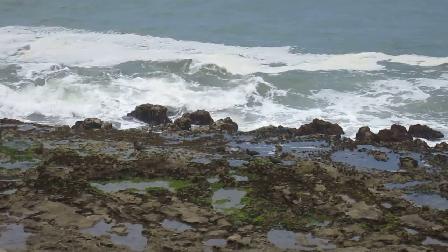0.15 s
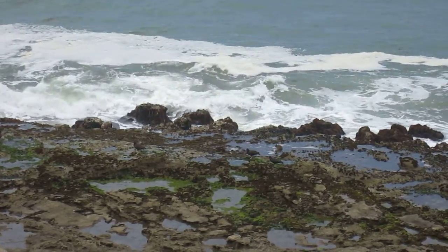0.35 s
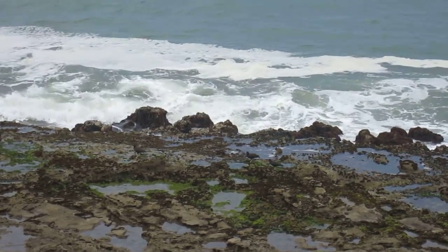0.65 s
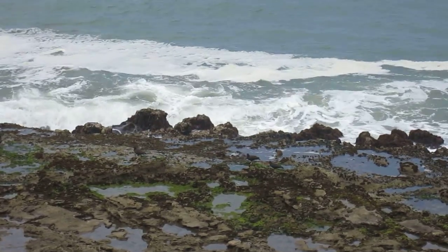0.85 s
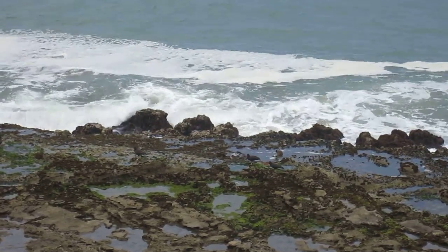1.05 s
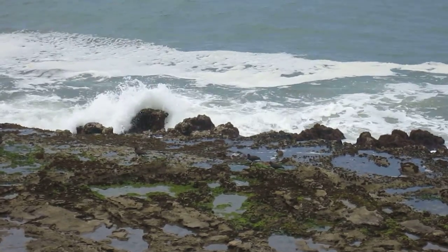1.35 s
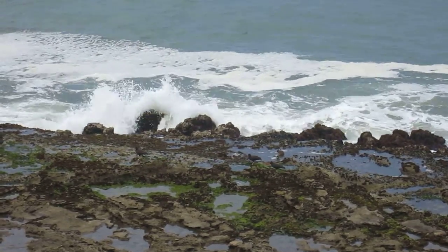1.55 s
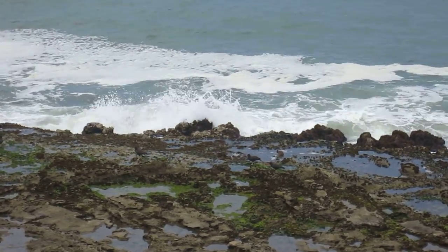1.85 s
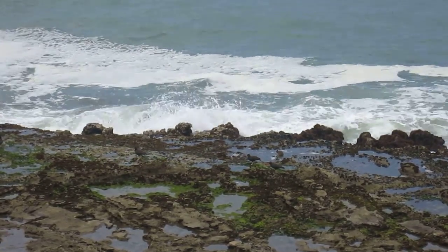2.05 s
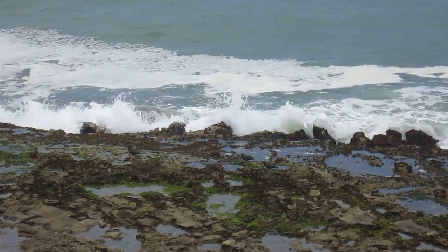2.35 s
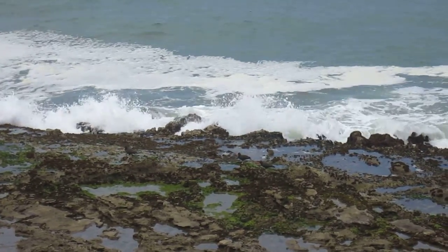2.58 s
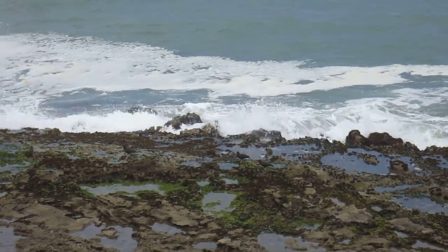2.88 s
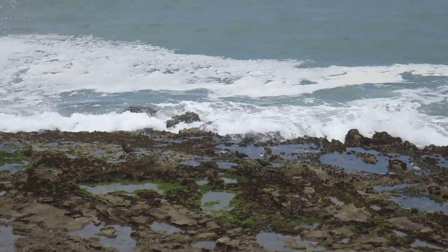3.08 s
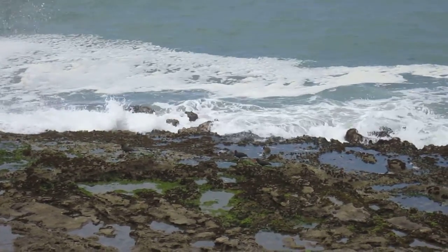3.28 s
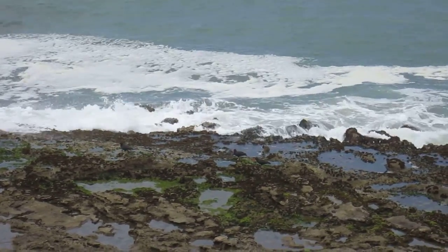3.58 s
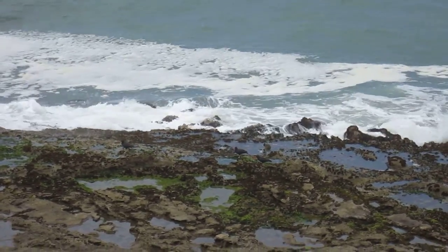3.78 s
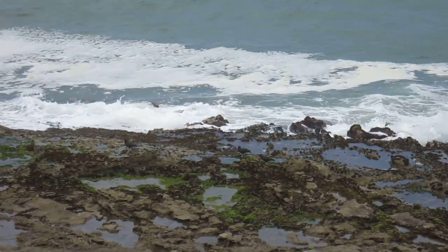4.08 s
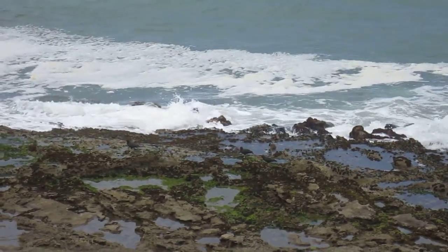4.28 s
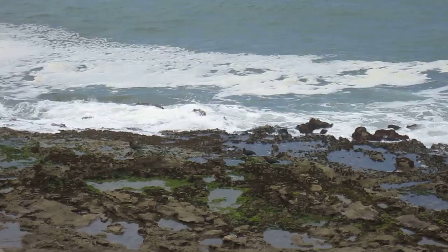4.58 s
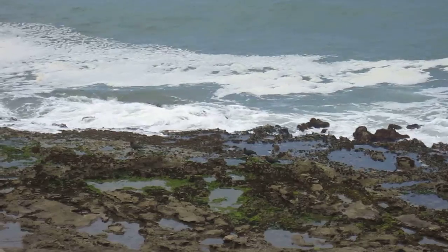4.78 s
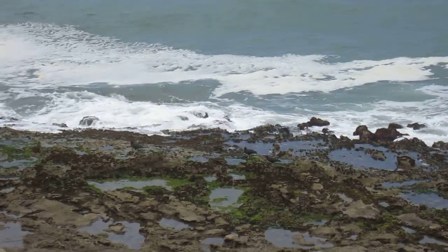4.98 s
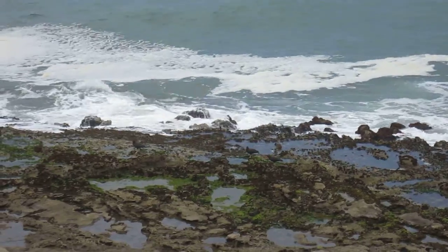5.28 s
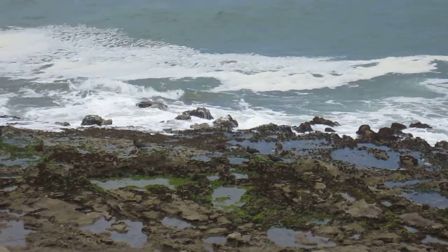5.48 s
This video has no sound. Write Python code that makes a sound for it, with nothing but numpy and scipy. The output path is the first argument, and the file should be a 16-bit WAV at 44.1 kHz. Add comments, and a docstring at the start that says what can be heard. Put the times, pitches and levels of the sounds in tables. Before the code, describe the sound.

Outdoors on a rocky seashore, lasting about 5.6 seconds. A sharp pipe and a heavy wind thud open together. An oystercatcher then pipes at about 0.7, 1.2, 1.7, 2.2, 2.7, 3.1, 3.7, 4.1, 4.7 and 5.2 seconds; each note is a tiny hoarse upward slide leaping to a clear, piercing whistle near 3 kHz, under a tenth of a second long, dropping abruptly at its end. The first two are weaker; those at 2.7 and 4.7 are strongest. Short dull rock echoes follow. Lumpy deep wind rumbles throughout, thudding hard near 0, 1.2 and 5 seconds, with clattering knocks near 1.2, 1.4, 2.7 and 5.4. Behind, broad soft surf stays steady, swells from 2.3 into a hissing foamy burst around 2.9-3.4, eases by 4, rises more dully near 4.5-5, and fades. Faint distant bird notes slip by at 1.8 and 4.9.

```python
"""First a sharp piped note and a thud of wind are heard together, on a rocky shore.
The note is the first of an oystercatcher's eleven, about two a second: low slides leaping to a whistle.
Behind it a wave bursts on the rocks and washes out as hissing foam, made of noise and random pops.
Wind rumbles on the microphone as filtered noise; large eddies thud on it and small ones knock.
Faint notes of birds farther along the shore are gliding sines; the rocks echo all the birds."""
import sys
import numpy as np
from scipy import signal
from scipy.fft import rfft, irfft
from scipy.io import wavfile
from scipy.ndimage import uniform_filter1d

SR = 44100
rng = np.random.default_rng(int(sys.argv[2]) if len(sys.argv) > 2 else 0)


def transcribe(u):
    """Save the signal u as a 16-bit wav file named by the first command-line argument.

    u: samples, shape (n,) or (channels, n), limited to [-1, 1]; the rate is SR.
    q: integer samples, one column per channel.
    """
    v = np.clip(np.atleast_2d(u).T, -1, 1)
    q = np.round(v * 32767).astype(np.int16)
    wavfile.write(sys.argv[1], SR, q)


N = 248283  # length [samples]

# Wind on the microphone, before the trims in wind(): (time [s], rumble level [dB], flutter level [dB])
WIND_LEVELS = [(0.0, -20, -19.5), (0.24, -19.0, -27.5), (0.36, -21.5, -24), (0.93, -23.0, -29),
               (1.17, -17, -20.5), (1.29, -24, -30.5), (1.5, -20, -21.5), (1.68, -28, -29.5),
               (1.92, -19, -22), (2.28, -24.5, -28.0), (2.97, -17, -21.5), (3.33, -24.5, -30.5),
               (3.54, -17, -23.5), (3.75, -20.5, -28), (4.26, -20.5, -22.5), (4.41, -24.0, -26.5),
               (5.28, -22.5, -23.5), (5.61, -27, -27.5)]
# Relative spectral density of the wind: (frequency [Hz], density [dB per Hz])
WIND_COLOUR = [(8, -43), (22, 3.5), (45, 1), (80, -0.5), (120, -2.5), (170, -7), (250, -13), (400, -21.5),
               (700, -32), (1500, -51.5), (4000, -72)]
# Buffets, each the dull thud of one large eddy: (time of centre [s], peak level [dB], centre frequency [Hz])
BUFFETS = [(0.03, -5, 80.4), (.167, -9.5, 88), (.914, -13.5, 61.5), (1.053, -12, 90), (1.185, -6.5, 73.6),
           (1.387, -10, 102), (1.871, -13.5, 99), (2.041, -11, 101), (2.663, -14.5, 113), (2.712, -11, 93),
           (3.477, -12, 94), (3.672, -10, 98), (3.689, -10, 45.7), (3.982, -11.5, 71), (4.967, -6.5, 74),
           (5.005, -10, 104), (5.259, -9, 110)]
# Knocks, each a short clatter of small eddies:
# (time of first eddy [s], peak level [dB], centre frequency [Hz], clatter length [s])
KNOCKS = [(.0355, -13.5, 206, 0.0026), (1.1858, -7.5, 398, 0.0061), (1.3807, -8.5, 386, 0.014),
          (1.93, -16.5, 231, .004), (2.6688, -13, 480, .002), (3.969, -13.5, 218, 0.0017),
          (4.13, -16.5, 307, 0.0032), (5.4242, -8.5, 514, 0.0036)]
# Surf as a wave bursts and washes out, before the trims in surf():
# (time [s], roar level [dB], foam fizz level [dB])
SURF_LEVELS = [(0.0, -39, -63.0), (0.21, -43, -66.5), (0.66, -39.5, -64), (1.14, -40, -64.5),
               (1.38, -43.0, -71.5), (1.71, -39.5, -65), (2.31, -38.5, -62), (2.85, -34, -56),
               (3.39, -34.5, -55), (4.02, -37.5, -64), (4.53, -35.5, -60.0), (4.95, -34.5, -63),
               (5.07, -37.0, -68), (5.16, -35.5, -65.5), (5.49, -39, -69), (5.61, -38, -68.5)]
# Relative spectral density of breaking surf: (frequency [Hz], density [dB per Hz])
SURF_COLOUR = [(60, -24), (250, 2.5), (550, 4.5), (800, 0), (1100, -0.5), (1600, -3.5), (2050, -3.5),
               (2600, -6), (3600, -4.5), (5600, -8), (8000, -17.5), (10500, -27), (13000, -33.5),
               (15600, -42)]
# Echoes off the rocks, before their treble is dulled: (delay [s], level [dB])
ECHOES = [(0.018, -11.5), (.03, -28.5)]
# Faint notes of distant birds:
# (time [s], length [s], starting frequency [Hz], ending frequency [Hz], level [dB])
FAR_NOTES = [(1.824, .022, 1840, 2200, -39), (4.866, 0.048, 2420, 2570, -35)]
# Piped notes: (time of the leap to the high register [s], length [s], nominal pitch [Hz], level [dB],
# overtone level [dB], lead-in length [s], crest position [share of note], crest strength [0-1])
PIPED_NOTES = [(0.013, 0.05, 3000, -28, -19, 0.017, 0.75, 0.46),
               (.681, 0.05, 3037, -27.5, -23.5, 0.018, 0.46, 0.57),
               (1.189, 0.059, 2942, -25, -19.5, 0.013, 0.47, 0.7),
               (1.685, .055, 2960, -20.5, -20.5, 0.016, 0.84, .2),
               (2.181, .063, 2973, -23, -20.5, 0.016, 0.55, 0.7),
               (2.666, 0.06, 2955, -18.5, -21.5, 0.0095, 0.65, 1),
               (3.134, 0.061, 2974, -21.5, -20, .009, 0.52, 1),
               (3.665, .06, 2946, -22, -19.5, 0.013, 0.645, 0.7),
               (4.105, 0.06, 2970, -23, -23.5, 0.013, 0.57, 1),
               (4.684, 0.058, 2942, -18, -16, .013, 0.65, 0.46),
               (5.182, 0.059, 2960, -21, -20.5, .013, 0.63, 0.4)]
# Partials of the high register, from the fundamental up: (relative level [dB])
WHISTLE_PARTIALS = [0, -15.5, -22, -32.5, -54]
# Partials of the low lead-in, from the fundamental up: (relative level [dB])
LEAD_IN_PARTIALS = [-3, -7.5, -14.5, -20]
# Throat resonance, favouring the fundamental near the top of the arch: (frequency [Hz], gain [dB])
THROAT = [(2150, -1), (2380, -15), (2700, -11), (2860, -6.5), (2960, 0.5)]

BUFFET_CYCLES = 0.734  # half length of an eddy [swings]
EDDY_GAP_S = 0.00433  # from one small eddy of a knock to the next
# Pitch contour of a note; depths are factors on the nominal pitch
SCOOP, SCOOP_S, ARCH_DEPTH, COLLAPSE, COLLAPSE_POWER = 0.092, 0.0098, 0.12, 0.26, 10.9
SCOOP_LEAD_S = 0.0134  # time constant: the longer the lead-in, the less is left to scoop
# The voice catches at the crest: time scale [s], upward flick [share of pitch], dip [dB], at full strength
CREST_S, CREST_FLICK, CREST_DIP_DB = 0.0033, 0.042, 15.5
# The overtones start low, swell, then die as the pitch collapses
SWELL_DB, SWELL_S, RELEASE_DB, RELEASE_POWER = 4, 0.0037, 39, 2.4
EDGE_HZ = 15700  # upper band limit


def amp(db):
    """Logarithmic level law: decibels to amplitude gain."""
    return 10 ** (np.asarray(db) / 20)


def evened(x):
    """Normalisation: scales a signal to rms 1."""
    return x / np.sqrt(np.mean(x ** 2) + 1e-20)


def read(points, hz):
    """Interpolation: reads a spectrum on a log-frequency axis."""
    f, value = np.transpose(points)
    return np.interp(np.log(hz + 1), np.log(f + 1), value)


def add(mix, s, sound):
    """Superposition: adds a sound to the mix at time s, in place."""
    start = round(s * SR)
    sound = sound[max(-start, 0):]
    part = mix[max(start, 0):][:len(sound)]
    part += sound[:len(part)]


def wander(count, hz):
    """Low-passed noise: a smooth random signal, changing up to about hz times a second."""
    padded = count + SR // 8
    f = np.fft.rfftfreq(padded, 1 / SR)
    spectrum = rfft(rng.standard_normal(padded)) * np.exp(-(f / hz) ** 2)
    return evened(irfft(spectrum))[:count]


def coloured(x, colour):
    """Linear filtering: multiplies the spectrum of a sound by a gain curve."""
    gain = amp(read(colour, np.fft.rfftfreq(N, 1 / SR)))
    return irfft(rfft(x) * gain, N)


def band_rms(x, lo, hi):
    """Band level: the rms of the part of a sound between two frequencies."""
    f = np.fft.rfftfreq(N, 1 / SR)
    return np.std(irfft(rfft(x) * ((f > lo) & (f < hi)), N))


def fade(t, length, rise, fall):
    """Sine-squared gating: soft ends, taking rise and fall seconds."""
    opening = np.clip(t / rise, 0, 1) * np.clip((length - t) / fall, 0, 1)
    return np.sin(np.pi / 2 * opening) ** 2


def wind(rumble_db=-3.0, flutter_db=-4.0, split_hz=115):
    """Turbulent pressure noise: a deep rumble and a flutter above it, both arriving in lumps."""
    air = coloured(rng.standard_normal(N), WIND_COLOUR)
    deep = signal.sosfiltfilt(signal.butter(3, split_hz, fs=SR, output="sos"), air)
    s, *levels = np.transpose(WIND_LEVELS)
    rumble, flutter = (np.interp(np.arange(N) / SR, s, level) for level in levels)
    lumps = amp(2.0 * wander(N, 35))
    low = amp(rumble + rumble_db) * evened(deep * lumps)
    high = amp(flutter + flutter_db) * evened((air - deep) * lumps)
    return low + high


def eddy(db, hz, steepness, unevenness=.14):
    """Vortex passage: the pressure shakes back and forth a few times, in uneven, steep-sided swings."""
    half = BUFFET_CYCLES / hz
    t = np.arange(-3 * half, 3 * half, 1 / SR)
    turns = np.cumsum(hz * (1 + unevenness * wander(len(t), hz))) / SR
    phase = 2 * np.pi * (turns - turns[len(t) // 2])  # the pressure flips as the eddy's core goes by
    swing = np.sin(phase + 2 * steepness * np.sin(phase))
    return amp(db) * np.exp(-(t / half) ** 2) * swing


def buffets(steepness=0.25):
    """Large-eddy buffeting: each large eddy thuds on the microphone at a low frequency."""
    out = np.zeros(N)
    for s, db, hz in BUFFETS:
        thud = eddy(db, hz, steepness)
        add(out, s - len(thud) / SR / 2, thud)
    return out


def knocks(count=4, steepness=0.3, scatter=0.24, fall_db=7):
    """Gust break-up: small eddies of uneven size follow each other, each weaker than the last."""
    out = np.zeros(N)
    for s, db, hz, length in KNOCKS:
        for lag in np.arange(count) * EDDY_GAP_S:
            level_db = db - fall_db * (lag / length) ** 2
            centre_hz = hz * np.exp(scatter * rng.standard_normal())
            knock = rng.choice([-1, 1]) * eddy(level_db, centre_hz, steepness)
            add(out, s + lag - len(knock) / SR / 2, knock)
    return out


def surf(roar_db=-3.5, wash_db=-0.5, fizz_db=-3., wash_follows=0.36, patch_db=0.67, flicker_db=.5,
         grain_db=4.0, grain_share=0.35):
    """Bubble noise: countless bursts sum to a roar, a fizz of foam, and a wash between that follows both."""
    chance = 3000 / SR  # 3000 pops a second on average
    pop_gain = amp(grain_db * np.minimum(rng.exponential(1, N), 4))
    pops = rng.standard_normal(N) * (rng.random(N) < chance) * pop_gain
    water = coloured(rng.standard_normal(N) + grain_share * evened(pops), SURF_COLOUR)
    bands = [(700, 1700), (4300, 5400), (9800, 11000)]  # roar, wash, fizz [Hz]
    hz, t, z = signal.stft(water, SR, nperseg=512, noverlap=384)
    s, roar, fizz = np.transpose(SURF_LEVELS)
    roar, fizz = roar + roar_db, fizz + fizz_db
    wash = roar + wash_follows * (fizz - roar) + wash_db
    # steer each band to its level, blending between band centres
    centres = np.log(np.mean(bands, axis=1))
    field_db = 0
    for level, band, own in zip((roar, wash, fizz), bands, np.eye(3)):
        weight = np.interp(np.log(hz + 1), centres, own)
        gain_db = np.interp(t, s, level) - 20 * np.log10(band_rms(water, *band))
        field_db = field_db + np.outer(weight, gain_db)
    # patches are local in time and frequency; flicker moves all frequencies together
    patches = uniform_filter1d(rng.standard_normal(z.shape), size=22, axis=1)
    patches = evened(uniform_filter1d(patches, size=8, axis=0))
    flicker = evened(uniform_filter1d(rng.standard_normal(len(t)), size=8))
    z = z * amp(field_db + patch_db * patches + flicker_db * flicker)
    return signal.istft(z, SR, nperseg=512, noverlap=384)[1][:N]


def shore(x, scatter_db=-21, t60=0.32):
    """Reflection: a few echoes and a short scatter off the rocks, duller than the direct sound."""
    t = np.arange(SR // 2) / SR
    sparse = rng.standard_normal(len(t)) * (rng.random(len(t)) < .05)
    taps = sparse * (t > .02) * amp(-60 * t / t60)
    taps *= amp(scatter_db) / np.linalg.norm(taps)
    for delay, db in ECHOES:
        add(taps, delay, amp([db]))
    reflected = signal.fftconvolve(x, taps)[:N]
    return x + coloured(reflected, [(3000, 0), (6000, -3.0), (12000, -9)])


def far_birds():
    """Masking: at a distance only the wavering fundamental of a note rises above the surf."""
    out = np.zeros(N)
    for s, length, from_hz, to_hz, db in FAR_NOTES:
        t = np.arange(0, length, 1 / SR)
        hz = np.linspace(from_hz, to_hz, len(t)) * (1 + 0.014 * wander(len(t), 300))
        tone = np.sin(2 * np.pi * np.cumsum(hz) / SR)
        add(out, s, amp(db) * fade(t, length, length / 2, length / 2) * tone)
    return out


def lead_in(length, db, from_hz=1760, to_hz=2220, jitter=0.027, thinning_db=11, break_hz=400):
    """Low register: a harmonic tone slides up hoarsely, thins and breaks up toward the whistle."""
    t = np.arange(0, length + .003, 1 / SR)
    slide = from_hz + (to_hz - from_hz) * t / t[-1]
    hz = slide + break_hz * np.exp((t - t[-1]) / 0.0022)  # the break adds a last upward bend
    turns = np.cumsum(hz * (1 + jitter * wander(len(t), 510))) / SR
    reedy_db = thinning_db * (.5 - t / length)  # overtones only
    tone = np.zeros(len(t))
    for order, partial_db in enumerate(LEAD_IN_PARTIALS, 1):
        tone += amp(partial_db + reedy_db * (order > 1)) * np.sin(2 * np.pi * order * turns)
    return amp(db) * tone * fade(t, t[-1], .7 * length, .003)


def whistle(length, hz, db, shrill_db, crest_at, crest, scoop, jitter=0.007, shimmer_db=0.7,
            octave_db=1.0, octave_follows=0.58):
    """High register: an arched harmonic tone scoops up, flicks and thins at its crest, then collapses."""
    t = np.arange(0, length + .002, 1 / SR)
    share = np.minimum(t / length, 1)
    collapse = share ** COLLAPSE_POWER
    catch = crest * np.exp(-((t - crest_at * length) / CREST_S) ** 2)
    arch = 1 / 16 - (share - .5) ** 2
    bend = ARCH_DEPTH * arch - scoop * np.exp(-t / SCOOP_S) - COLLAPSE * collapse + CREST_FLICK * catch
    pitch = hz * (1 + bend)
    turns = np.cumsum(pitch * (1 + jitter * wander(len(t), 500))) / SR
    upper_db = shrill_db - SWELL_DB * np.exp(-t / SWELL_S) - RELEASE_DB * collapse ** RELEASE_POWER
    # the octave grows with the note's level and holds through the crest, where the other partials dip
    dip = CREST_DIP_DB * catch
    fundamental_db = db + read(THROAT, pitch) - dip
    second_db = upper_db + octave_db + octave_follows * (db - shrill_db)
    shapes_db = [fundamental_db, second_db] + [upper_db - dip] * len(WHISTLE_PARTIALS)
    tone = np.zeros(len(t))
    for order, (partial_db, shape_db) in enumerate(zip(WHISTLE_PARTIALS, shapes_db), 1):
        unsteady_db = shimmer_db * order * wander(len(t), 110)  # the higher the partial, the less steady
        tone += amp(partial_db + shape_db + unsteady_db) * np.sin(2 * np.pi * order * turns)
    return tone * fade(t, t[-1], .003, .004)


def bird(lead_db=-19.0, lead_follows=0.33):
    """Register leap: a low slide jumps to the whistle; a louder note has a slightly louder slide."""
    out = np.zeros(N)
    for s, length, hz, db, shrill_db, lead, crest_at, crest in PIPED_NOTES:
        add(out, s - lead, lead_in(lead, lead_db + lead_follows * db))
        scoop = SCOOP * np.exp(-lead / SCOOP_LEAD_S)
        add(out, s - .001, whistle(length, hz, db, shrill_db, crest_at, crest, scoop))
    return out


def scene():
    """Superposition: wind at the microphone, the sea, and the birds with their echoes off the rocks."""
    background = wind() + buffets() + knocks() + surf()
    return (background + shore(far_birds() + bird()))[None]


def record(dry):
    """Band limitation: the recorder passes only what lies below its upper edge."""
    low_pass = signal.firwin(511, EDGE_HZ, window=("kaiser", 9), fs=SR)
    return signal.oaconvolve(dry, low_pass[None], "same")


dry = scene()
out = record(dry)
transcribe(out)
```